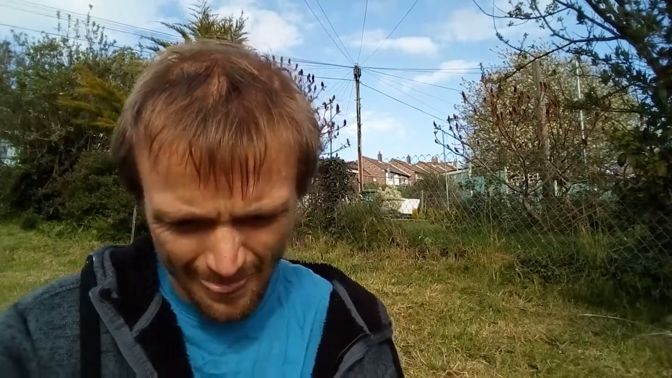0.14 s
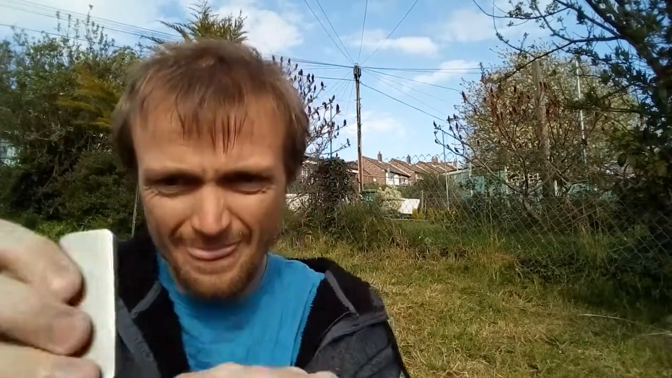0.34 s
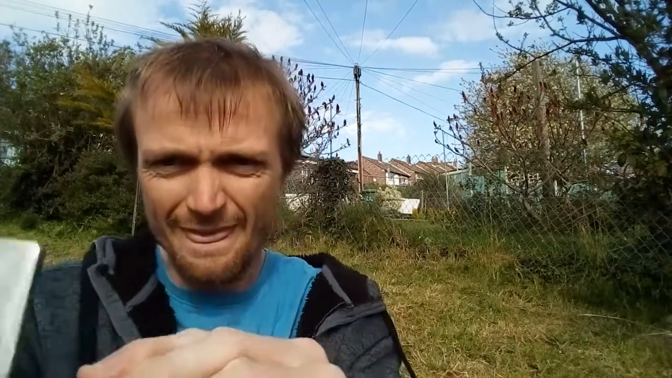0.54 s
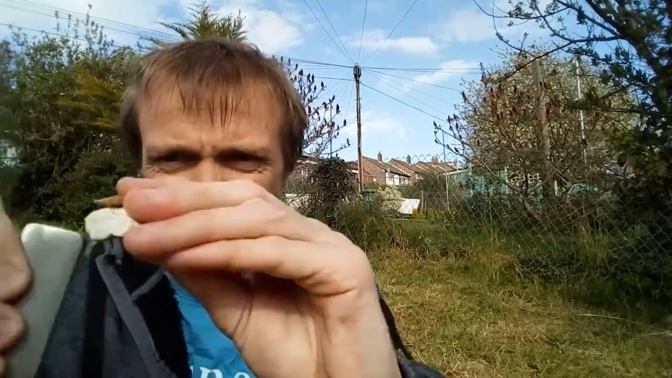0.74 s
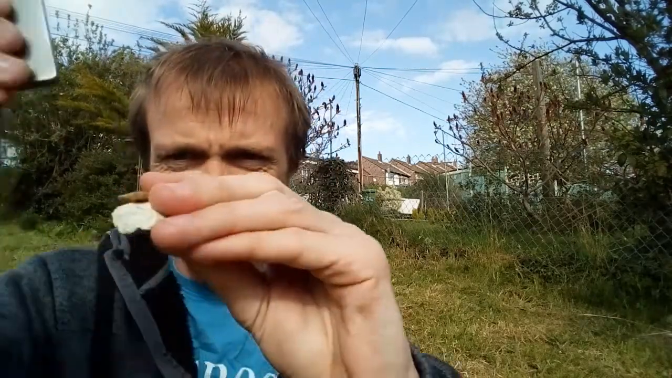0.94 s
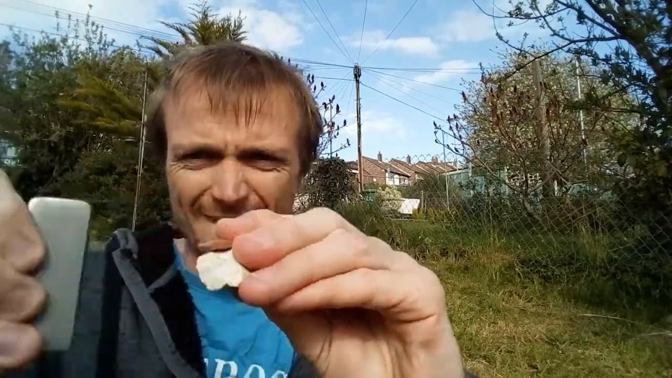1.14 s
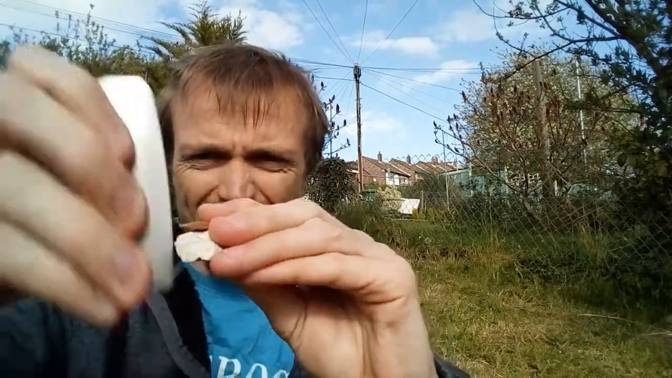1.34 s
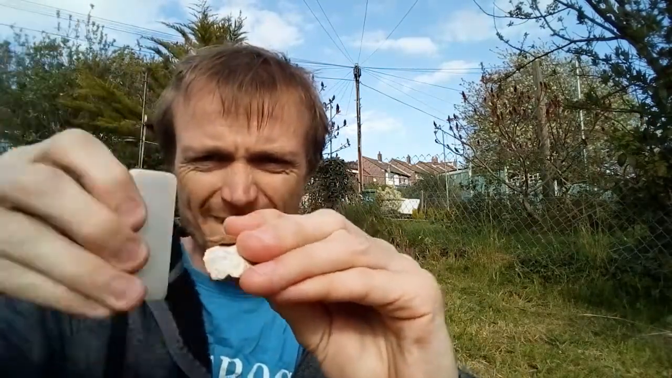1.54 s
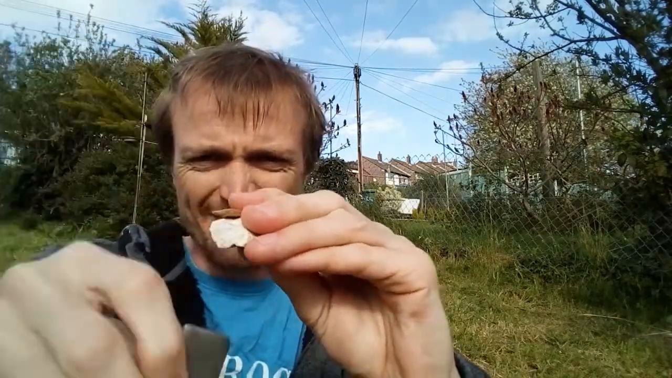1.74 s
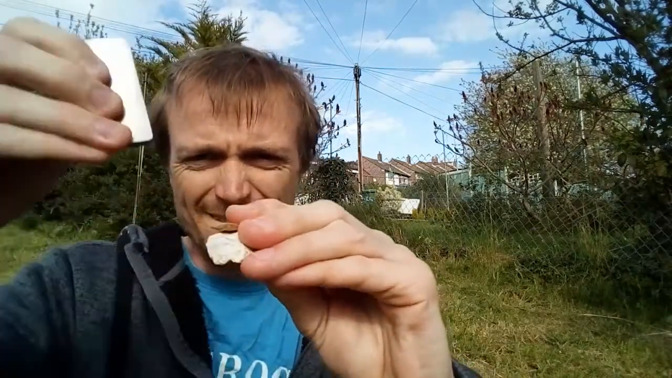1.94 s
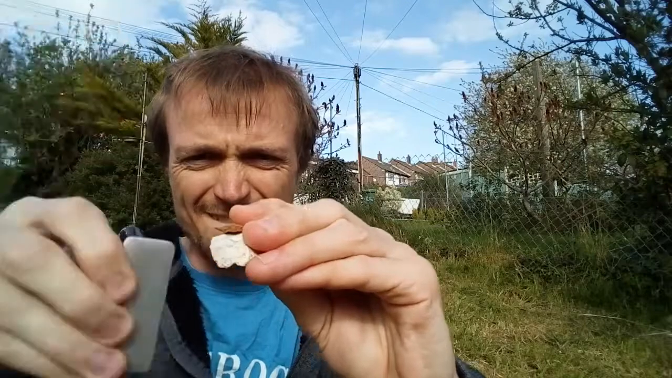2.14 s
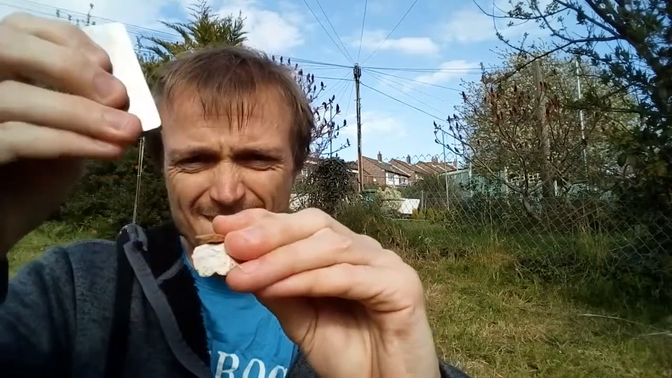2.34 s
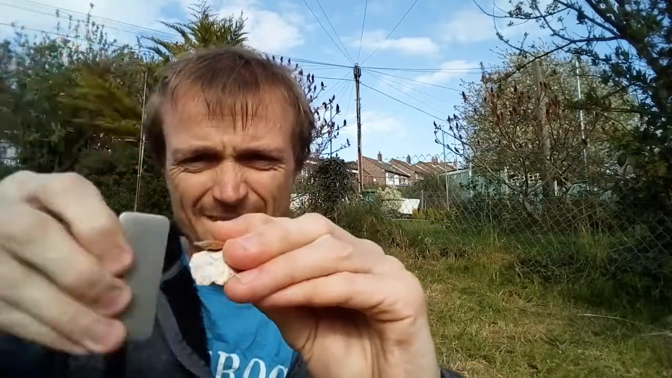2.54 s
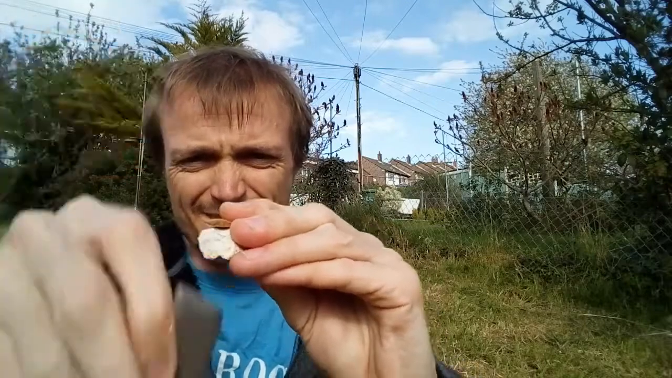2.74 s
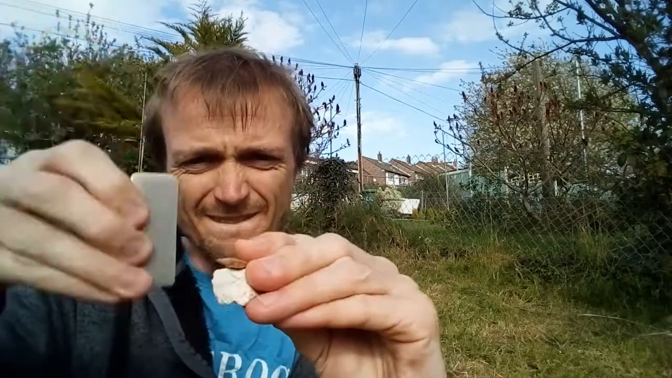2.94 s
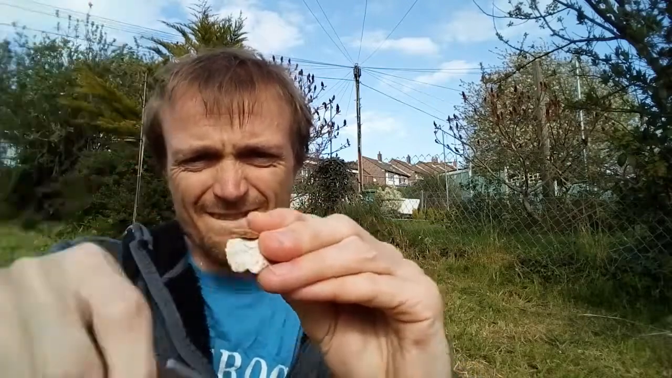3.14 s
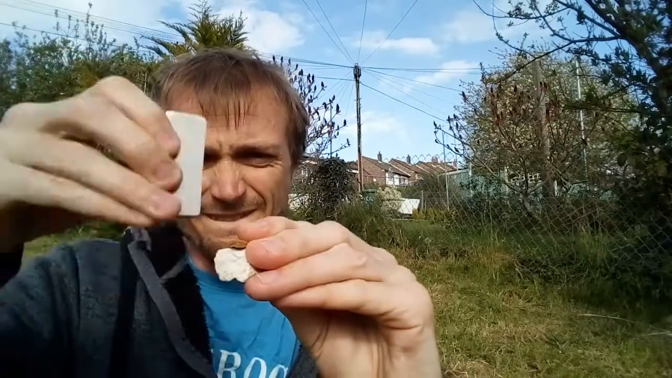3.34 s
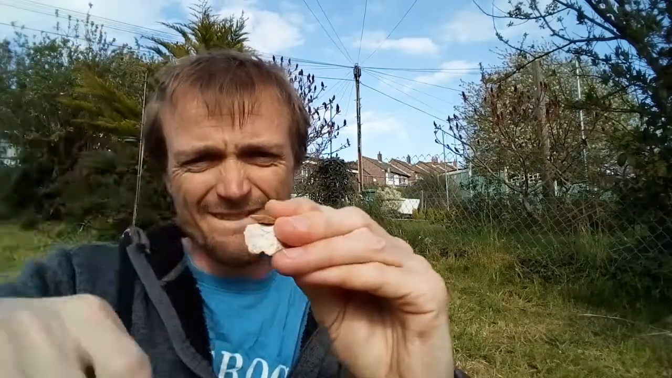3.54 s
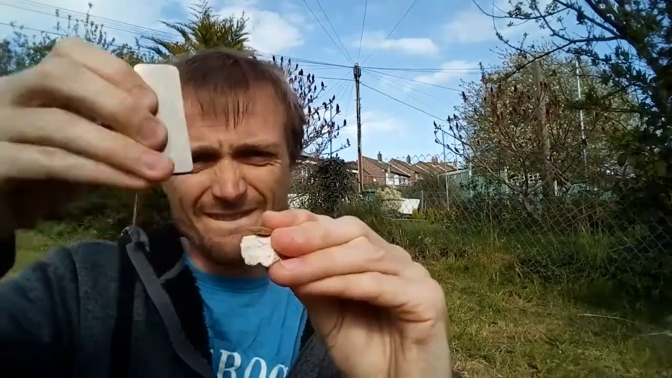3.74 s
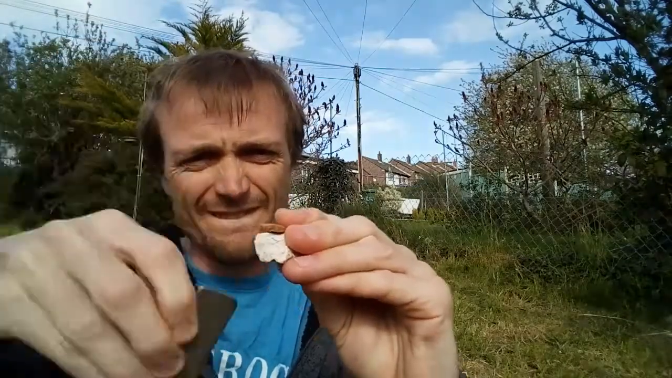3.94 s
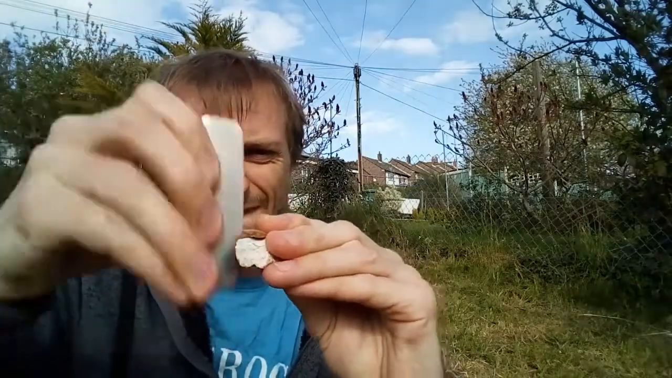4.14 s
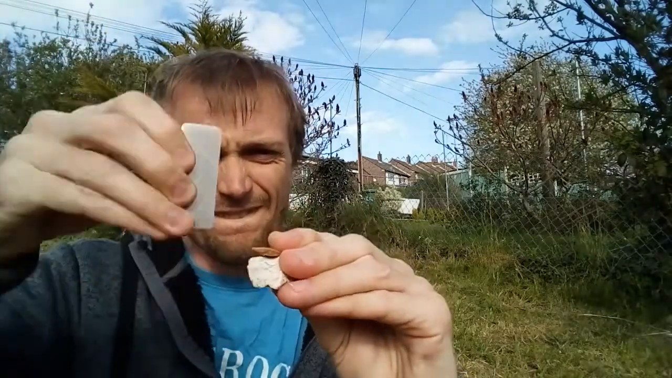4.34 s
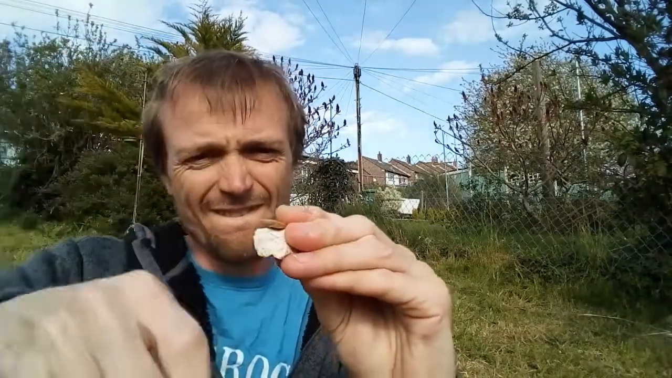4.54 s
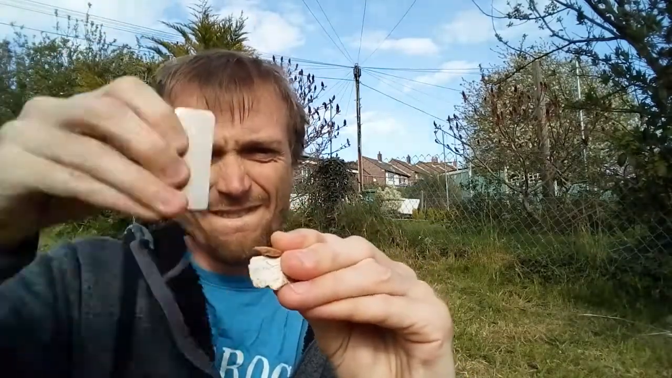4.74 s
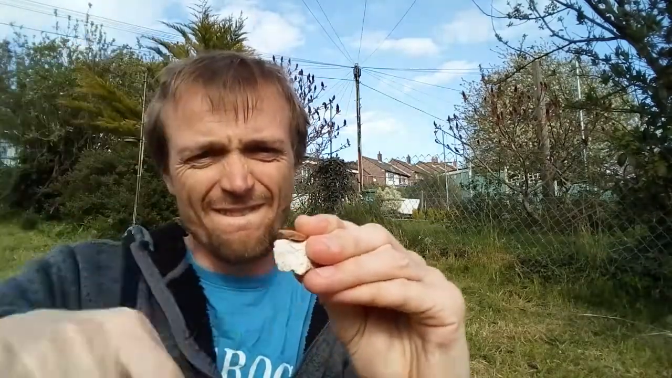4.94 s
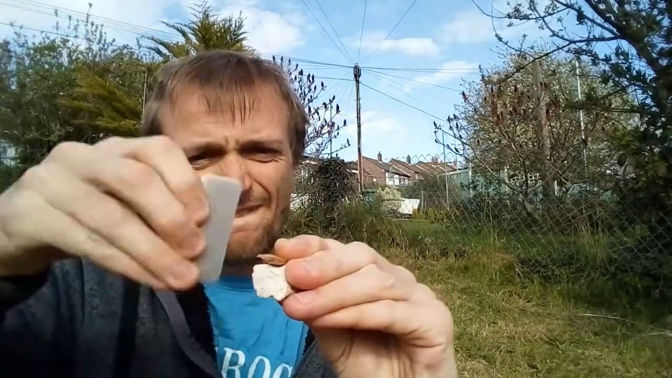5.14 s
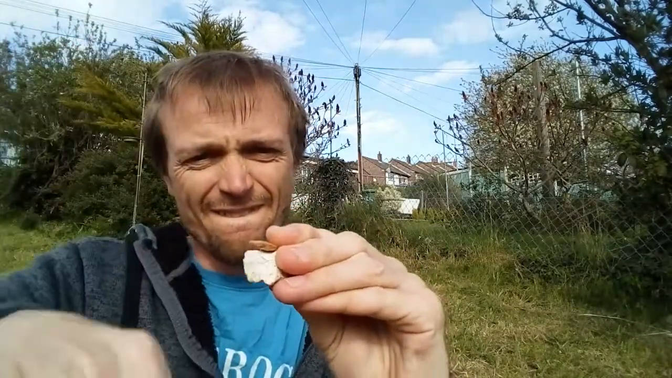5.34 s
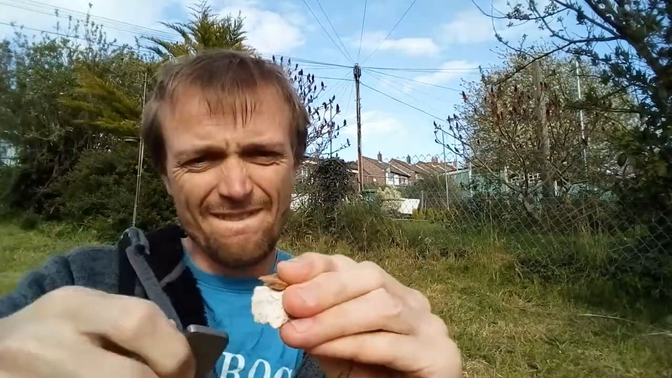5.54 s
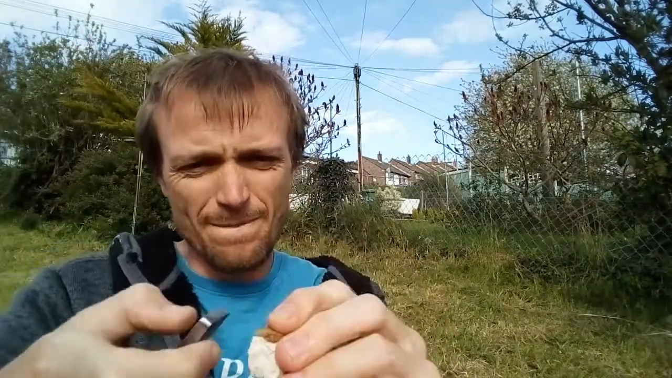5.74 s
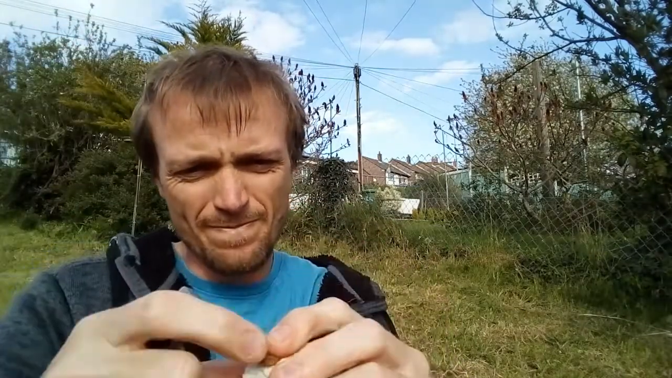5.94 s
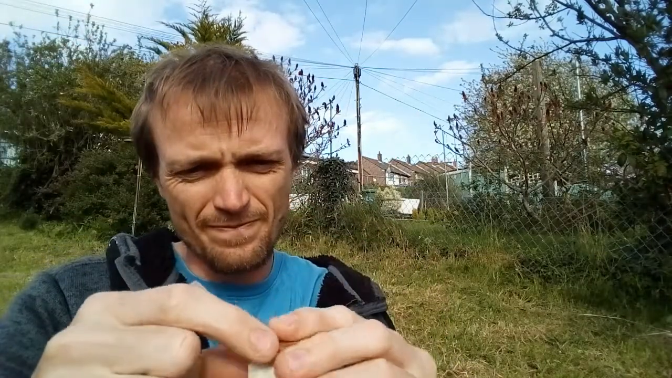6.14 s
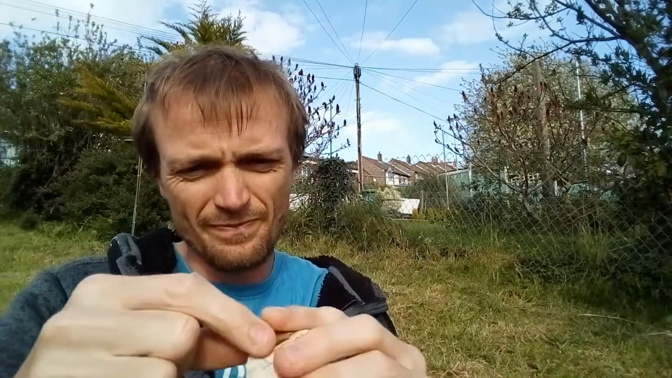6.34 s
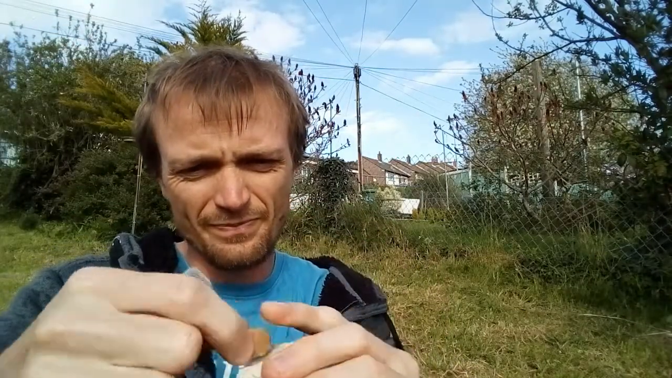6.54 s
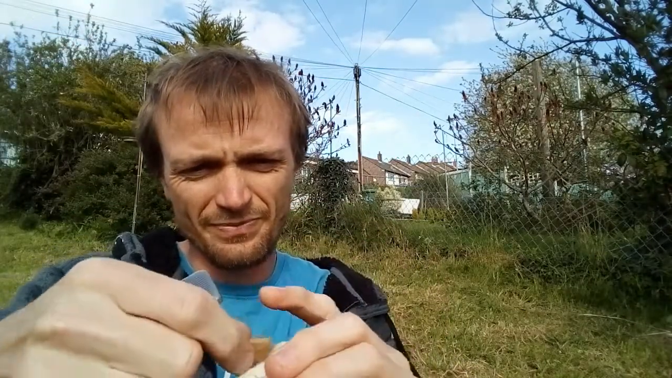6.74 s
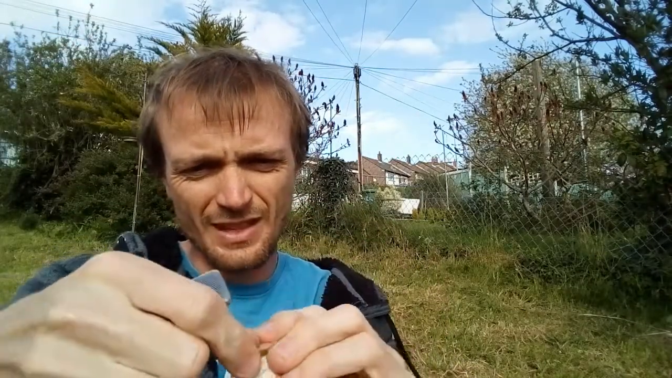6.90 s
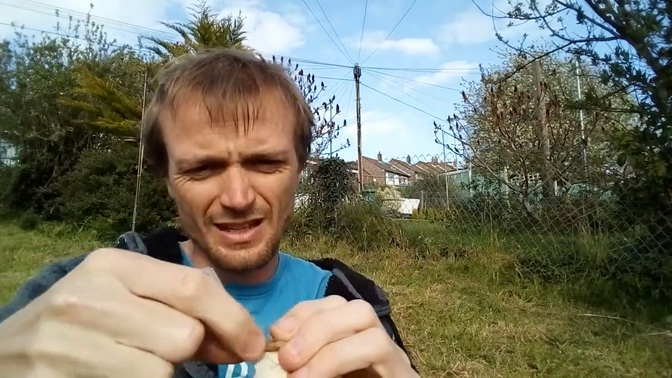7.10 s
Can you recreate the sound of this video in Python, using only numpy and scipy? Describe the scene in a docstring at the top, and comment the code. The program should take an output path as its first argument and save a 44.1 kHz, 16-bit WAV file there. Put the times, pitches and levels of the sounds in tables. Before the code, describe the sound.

Very close to a stereo microphone outdoors, a small steel striker snaps down a flint fifteen times, roughly three strokes a second. Each is a hard, dry crack with a tiny gritty scrape and a faint metallic ping. Wind rumbles low, gusting near two and just after three seconds. Weak garden echoes and very distant chirps sit behind. Strokes stop after five seconds, leaving quiet air.

```python
"""In a garden, a steel striker is swept down a flint fifteen times, close to a two-port microphone.
In each stroke the steel lands, bites, scrapes and flicks off: bursts and grains of noise ring the stone.
Decaying tones make the steel ping faintly, and scattered echoes make the garden answer.
Shaped noise makes wind rumble on the microphone; gliding tones make small birds chirp far away.
Soft hiss, a low drone and a thin whine lie beneath."""
import sys
import numpy as np
from scipy import signal
from scipy.fft import rfft, irfft
from scipy.io import wavfile
from scipy.ndimage import uniform_filter1d

SR = 44100
rng = np.random.default_rng(int(sys.argv[2]) if len(sys.argv) > 2 else 0)


def waveform_to_disk(signal):
    """Save audio, clipped to [-1, 1], as 16-bit WAV at the path in sys.argv[1]."""
    frames = np.transpose(np.atleast_2d(signal))
    scaled = np.clip(frames, -1, 1) * 32767
    samples = np.round(scaled).astype(np.int16)
    wavfile.write(sys.argv[1], SR, samples)


N = 316064

# The strokes; stroke() trims the scrape and the blows by a small shared amount.
# Each row: start in seconds, length in seconds, scrape level in dB, fade of the scrape in dB,
# landing blow in dB, delay of the bite in seconds, bite in dB, parting blow in dB,
# lower note of the stone in Hz, upper note in Hz, knock in dB, clack in dB, sizzle in dB.
STRIKER_STROKES = [(.4167, .025, -31, 20, -3.5, 0.0036, -31, -29, 3440, 4500, -7, 4, 11.5),
                   (.734, .029, -26, 16.5, -9, .0056, -2, -18, 2200, 3800, 4.5, 0, 1),
                   (1.0368, .028, -25, 10.5, -14.5, .0033, 1, -18, 2953, 4450, -7, 0.5, -4),
                   (1.392, .021, -26.5, 9.5, -10.5, .0041, 3, -11, 2290, 5850, 7.5, -1, 2),
                   (1.7308, .015, -24, 8, -1.5, .0017, 2, -14, 2920, 5990, -0.5, 3.5, -3),
                   (2.0596, .024, -22.5, 11, -4, .0082, 3, -6.5, 3350, 3910, 0, -4.5, -2),
                   (2.4084, .016, -17.5, 10.5, -1, .0072, -1.5, -13.5, 2290, 3800, -4.5, 0, -6.5),
                   (2.7606, .014, -22, 4.5, -11, .008, 2, -14, 2533, 2860, -5.5, -2, -4.5),
                   (3.121, .0213, -23, 8, -0.5, .003, 0, -16, 3420, 6070, 4, -5.5, 0),
                   (3.498, .004, -23.5, 3.5, 1.1, .0005, -5.5, -11.5, 1994, 4200, 8.5, -0.5, 6),
                   (3.854, .0247, -27.5, 3.5, -10.5, .0078, -3, -15.5, 2352, 7300, 4, 2.5, 1.5),
                   (4.1857, .016, -35.5, -9, -1.5, .005, -5, -7, 2025, 4320, -0.5, -1, -3),
                   (4.5173, 0.015, -26.5, -0.5, -7, .0066, 0, -13, 2427, 3300, -4.5, -2, 1.5),
                   (4.8934, .015, -27, 2, -3, .0051, 2.5, -22, 2450, 5550, -2, -0.5, 1.5),
                   (5.3296, .0055, -19.5, 4.5, -5, 0.00101, -0.5, -4.5, 2570, 4380, 8, 1.5, 2)]
# Light ticks and brushes. Each row: start in seconds, time to die to about a third in seconds,
# starting level in dB, centre in Hz, width in octaves, ring of the steel in dB against its usual ring.
LIGHT_TOUCHES = [(.0025, 0.004, -27, 4090, 1.5, 16), (0.477, .012, -48.5, 2070, .69, -12),
                 (0.489, 0.011, -46.5, 2000, 0.43, 7), (2.991, 0.0031, -61, 4560, 0.54, -14),
                 (5.226, .0018, -60, 4500, 0.72, -11), (7.136, .0044, -42.5, 1890, 0.16, -5)]
# Thin, very short treble ticks just before two of the strokes. Each row: start in seconds, level in dB.
TREBLE_TICKS = [(.7135, -32), (.7237, -16.5), (4.874, -22), (4.8836, -13.5)]
# The colour of these ticks. Each row: pitch in Hz, relative level in dB per Hz.
TICK_SPECTRUM = [(1500, -25), (4000, -9), (5600, -2), (8000, -14), (11000, -7.5), (13000, -9.5),
                 (14600, -1), (16000, -6)]
# The crack of the stone, before each contact colours it. Each row: pitch in Hz, relative level in dB per Hz.
STONE_CRACK = [(250, -54), (590, -41.5), (750, -21.5), (1050, -17), (1330, -9), (1650, -7.5), (2350, -1),
               (3200, -4.5), (3950, -1.5), (5000, -7), (5750, -4.5), (6700, -11.5), (9800, -14),
               (12500, -21.5), (15500, -32.5)]
# The steel, damped by the fingers. Each row: pitch in Hz, level in dB against the contact,
# time to fall by 60 dB in seconds.
STEEL_MODES = [(7410, -11, .011), (12000, -16.5, .013), (7245, -34, .14), (7430, -36, .1),
               (11770, -34.5, .1), (14350, -32, .02)]
# How the ports differ for sound from the hands. Each row: pitch in Hz, left minus right in dB.
PORT_BALANCE = [(700, 0.5), (1600, 3), (2400, -2.5), (3200, -12), (3900, 7.5), (4500, 10), (5100, -13),
                (6000, -3.5), (6700, 3), (7250, -1.5), (8200, -11.5), (12500, -16), (15000, -7)]
# Their timing. Each row: pitch in Hz, lead of the left port in radians.
PORT_LEAD = [(700, 1), (3250, 0.62), (3550, 2), (4150, 2.5), (4450, 4), (4950, 4.5), (5250, 2.5),
             (5550, -0.35), (6400, 2), (6900, -2.24), (10000, 4.5), (11500, 1.5)]
# Scatter from hedges and fences. Each row: pitch in Hz, relative level in dB.
GARDEN_SPECTRUM = [(700, -21.5), (2000, -32), (4000, -27.5), (7300, -22.5), (9000, -27.5), (15000, -32)]
# How long it lingers. Each row: pitch in Hz, time to fall by 60 dB in seconds.
GARDEN_DECAY = [(700, .25), (2500, 0.34), (5000, 0.31), (8000, 0.15), (15000, .15)]
# Far birds. Each row: start in seconds, length in seconds, start in Hz, end in Hz,
# level in dB before the shared gains.
BIRD_CHIRPS = [(0.175, 0.046, 6100, 5620, -76.5), (0.215, 0.046, 11300, 9500, -78),
               (1.194, 0.032, 3210, 4770, -76), (1.305, .027, 4730, 5200, -76.5),
               (1.502, 0.071, 4740, 4770, -74.5), (2.249, .082, 7240, 6450, -79),
               (2.63, .076, 5700, 5440, -77), (2.924, 0.055, 3190, 4330, -75),
               (3.253, 0.025, 6400, 6400, -71), (4.269, 0.05, 4520, 5040, -71),
               (5.1, 0.058, 5850, 5530, -74), (5.559, .049, 4840, 4720, -77.5),
               (5.653, 0.045, 4750, 4710, -79.5), (5.728, 0.053, 4790, 4750, -81),
               (5.918, .025, 6140, 6400, -78.5), (6.109, .025, 6110, 6350, -79.5),
               (6.115, .041, 2700, 3630, -81), (6.147, 0.036, 3540, 3760, -74),
               (6.176, 0.037, 3745, 3550, -70.5), (6.225, 0.031, 3700, 3600, -78.5),
               (6.682, .04, 4200, 4660, -81)]
# A faint low hollow sound now and then. Each row: start in seconds, length in seconds, level in dB at the height.
HOLLOW_SWELLS = [(0.279, 0.42, -68), (4.403, 0.37, -69.5), (5.819, .45, -70)]
# The steady breeze on the microphone. Each row: time in seconds, rumble in dB,
# deep pressure swell in dB before its shared gain.
BREEZE_LEVELS = [(0, -57.5, -60.5), (.8, -58, -56), (1.35, -62, -57), (2.6, -56, -55.5),
                 (2.9, -59.5, -66.5), (3.65, -53.5, -59), (4.1, -60, -64), (4.65, -55.5, -60.5),
                 (5.15, -62.5, -73.5), (6.1, -59, -57.5), (6.4, -64, -62), (6.8, -60, -54.5),
                 (7.17, -61, -66.5)]
# Gusts on top of the breeze. Each row: peak in seconds, time from the peak to about a third in seconds,
# rumble in dB at the peak.
GUST_PEAKS = [(1.16, 0.041, -44), (1.255, 0.026, -45.5), (1.717, .035, -38.5), (1.959, 0.046, -34.5),
              (3.14, .1, -41.5), (3.32, 0.06, -35), (3.438, 0.0478, -34)]
# Rumble of calm wind. Each row: pitch in Hz, relative level in dB per Hz.
CALM_RUMBLE = [(50, -25), (80, 0.5), (120, -1), (160, -7), (240, -20), (400, -28.5), (700, -41.5),
               (1500, -75.5)]
# Buffeting of strong gusts. Each row: pitch in Hz, relative level in dB per Hz.
GUST_BUFFET = [(50, -26), (80, -6), (105, -1), (122, 3), (160, -12), (240, -20.5), (350, -32), (700, -42.5),
               (1500, -70.5)]
# The deep swell beneath the wind. Each row: pitch in Hz, relative level in dB per Hz.
DEEP_SWELL = [(20, -13), (38, -10.5), (58, 2), (72, 2.5), (100, -20), (200, -65.5)]
# The quiet of the garden. Each row: pitch in Hz, relative level in dB per Hz.
AIR_SPECTRUM = [(60, -10), (300, 2.5), (550, -3), (850, -1.5), (1500, -8.5), (2500, -11.5), (4500, -12),
                (6500, -14.5), (8200, -21.5), (13500, -20.5), (15000, -15), (15500, -15.5), (15900, -44.5)]
# Its loudness. Each row: time in seconds, level in dB before drift and left-right balance.
AIR_LEVEL = [(0, -67), (.8, -67.5), (1.2, -68), (3, -69.5), (5.5, -69.5), (5.8, -67.5), (6.5, -70),
             (7.17, -65.5)]
# How alike noise is on the left and right. Each row: pitch in Hz, likeness from 0 (separate) to 1 (the same).
PORT_LIKENESS = [(60, .85), (130, 0.81), (290, 0.74), (640, .2), (1410, 0), (15000, 0)]
# A thin whine that sinks slowly. Each row: time in seconds, base pitch in Hz before drift.
WHINE_PITCH = [(0, 3165), (.8, 3130), (1.6, 3075), (2.6, 3030), (4.5, 3015), (6, 2990), (7.17, 2985)]
# Its tones. Each row: multiple of the base pitch, level in dB before drift.
WHINE_TONES = [(2, -89), (3, -93), (4, -96.5)]

HUM_HZ, HUM_DB = 118, -63.5  # middle of the wavering drone
GUST_DEEP_DB = -8.5  # the deep swell under a gust, against its rumble
# a square hit knocks below the first pitch, a flat one clacks around the second, a keen edge sizzles above the third
KNOCK_HZ, CLACK_HZ, SIZZLE_HZ = 1200, 1480, 6660
CLACK_WIDTH_HZ = 420
FENCE_S, FENCE_DB, FENCE_FROM_HZ = 0.032, -33, 3500  # one distinct, thin echo, perhaps from a fence
EDGE_HZ = 16200  # top of the band


def stroke(s, length, scrape_db, fade_db, land_db, bite_s, bite_db, part_db,
           low_hz, high_hz, knock_db, clack_db, sizzle_db,
           release_s=.0026, crumble_s=.0009, crumble_db=-3.5, blow_db=-1.1, grit_db=-.5,
           note_db=4, note_width_hz=130, stutter_db=3.0, catches_per_s=500, catch_db=16,
           scrape_bright_db=-.3, land_bright_db=0.67, bite_bright_db=0.77, part_bright_db=1.5):
    """The steel lands, bites a moment later, scrapes down the edge and flicks off; each contact excites the stone."""
    t = np.arange(round(length * SR) + SR // 40) / SR
    progress = np.minimum(t / length, 1)

    def stone(bright_db):
        """The response of the stone to one sharp or blunt contact."""
        def spectrum(hz):
            """The crack, coloured by how the steel meets the stone."""
            notes = sum(note_db / (1 + ((hz - f) / note_width_hz) ** 2) for f in (low_hz, high_hz))
            knock = knock_db / (1 + (hz / KNOCK_HZ) ** 6)
            clack = clack_db * np.exp(-((hz - CLACK_HZ) / CLACK_WIDTH_HZ) ** 2)
            # less below the sizzle pitch leaves relatively more above it
            dulling = sizzle_db / (1 + (hz / SIZZLE_HZ) ** 4)
            return read(STONE_CRACK, hz) + knock - dulling + clack + notes + tilt(hz, bright_db)
        return ring(spectrum)

    # the edge grips and lets go every millisecond or two, and now and then catches harder
    stutter = evened(uniform_filter1d(rng.standard_normal(len(t)), size=60))
    fractures = grit(len(t)) * amp(stutter_db * stutter)
    fractures += amp(catch_db) * grit(len(t), spread_db=2.0, grains_per_s=catches_per_s)

    pressure = amp(scrape_db + grit_db - fade_db * progress)
    pressure *= np.exp(-np.maximum(t - length, 0) / release_s)
    sound = pressure * signal.fftconvolve(fractures, stone(scrape_bright_db))[:len(t)]
    sound *= np.linalg.norm(pressure) / np.linalg.norm(sound)

    blows = ((0, land_db, land_bright_db), (bite_s, bite_db, bite_bright_db),
             (length, part_db, part_bright_db))
    for at, db, bright_db in blows:
        # a blow is one sharp push, then a moment of crumbling
        chips = grit(len(t)) * np.exp(-t / crumble_s)
        push = amp(crumble_db) * chips / (np.linalg.norm(chips) + 1e-9)
        push[0] += 1
        crack = signal.fftconvolve(push, stone(bright_db))
        add(sound, at, amp(db + blow_db) * crack / np.linalg.norm(crack))
    return s, near_echoes(with_steel(sound))


def grit(n, spread_db=4, grains_per_s=9000):
    """Grains of uneven size, as when an edge shaves steel in tiny fractures: clicks at random moments."""
    size = amp(spread_db * np.minimum(rng.exponential(1, n), 3))
    happens = rng.random(n) < grains_per_s / SR
    return rng.choice([-1, 1], n) * size * happens


def with_steel(x, ring_db=0):
    """The striker pings: each of its modes is a decaying tone added to the contact sound."""
    t = np.arange(SR // 5) / SR
    h = np.zeros(len(t))
    for hz, db, t60 in STEEL_MODES:
        mode = amp(-60 * t / t60) * np.sin(2 * np.pi * hz * t)
        h += amp(ring_db + db) * mode / np.linalg.norm(mode)
    h[0] += 1  # the contact itself
    return signal.fftconvolve(x, h)


def touch(s, length, db, centre_hz, octaves, ring_db):
    """A light tick or brush: a dying burst of grit in one band."""
    t = np.arange(round(4 * length * SR) + SR // 100) / SR
    band = ring(lambda hz: -10 * np.log10(1 + (np.log2((hz + 1) / centre_hz) / octaves) ** 4))
    burst = evened(signal.fftconvolve(grit(len(t)), band)[:len(t)])
    return s, with_steel(amp(db) * np.exp(-t / length) * burst, ring_db)


def treble_tick(s, db, fade_s=.0012):
    """A thin, very short tick: a dying spit of bright grains."""
    t = np.arange(SR // 100) / SR
    spit = grit(len(t)) * np.exp(-t / fade_s)
    sound = signal.fftconvolve(spit, ring(lambda hz: read(TICK_SPECTRUM, hz)))
    return s, amp(db) * sound / np.linalg.norm(sound)


def near_echoes(x, hands_db=-13, chest_db=-25, count=6):
    """The moving hands and the chest throw back a few echoes, new for each stroke and each port."""
    h = np.zeros((2, SR // 50))
    h[:, 0] = 1
    # hands within 2 ms, chest from 2.5 to 18 ms; delays counted in samples
    for db, first, last in ((hands_db, 8, SR // 500), (chest_db, SR // 400, SR // 55)):
        for port in h:
            port[rng.integers(first, last, count)] += amp(db) * rng.choice([-1, 1], count) / np.sqrt(count)
    return signal.fftconvolve(x[None], h, axes=1)


def ports(x):
    """The body of the microphone shades and delays each port differently; left and right gains keep total power."""
    hz = np.fft.rfftfreq(N, 1 / SR)
    ratio = amp(read(PORT_BALANCE, hz))
    left, right = rfft(x) * np.sqrt(2 / (1 + ratio ** 2))
    lead = np.exp(1j * read(PORT_LEAD, hz))
    return irfft([left * ratio * lead, right], N)


def garden(x, start_s=.009):
    """Faint sparse echoes from the ground, hedges and fences, each pitch dying at its own pace."""
    taps = rng.standard_normal((2, SR // 2)) * (rng.random((2, SR // 2)) < 2500 / SR)
    hz, t, z = signal.stft(taps / taps.std(), SR, nperseg=256)
    t60 = read(GARDEN_DECAY, hz)[:, None]
    z *= amp(read(GARDEN_SPECTRUM, hz)[:, None] - 60 * t / t60)
    z *= np.sqrt(2 * np.log(1000) / (t60 * SR))  # same energy for long and short tails
    tail = signal.istft(z, SR, nperseg=256)[1]
    tail = np.pad(tail, ((0, 0), (round(start_s * SR), 0)))
    return signal.fftconvolve(x[None], tail, axes=1)[:, :N] * amp([[-2], [1.5]])


def fence(x):
    """One late, quiet copy of the sound, thinned by removing its low notes."""
    thin = signal.lfilter(*signal.butter(2, FENCE_FROM_HZ, "high", fs=SR), x)
    return FENCE_S, amp(FENCE_DB) * thin


def chirp(s, length, from_hz, to_hz, db, waver=.012):
    """A bird: one gliding, slightly unsteady whistle."""
    n = round(length * SR)
    wobble = evened(uniform_filter1d(rng.standard_normal(n), size=100))
    hz = np.linspace(from_hz, to_hz, n) * (1 + waver * wobble)
    return s, amp(db) * 2 * np.hanning(n) * np.sin(2 * np.pi * np.cumsum(hz) / SR)


def hollow_swell(s, length, db, centre_hz=355, width_hz=90):
    """A narrow band of noise that rises and falls away."""
    n = round(length * SR)
    band = ring(lambda hz: -20 * np.log10(1 + ((hz - centre_hz) / width_hz) ** 4))
    noise = evened(signal.fftconvolve(rng.standard_normal(n), band)[:n])
    return s, amp(db) * np.hanning(n) * noise


def wind(wind_db=0.0, swell_db=0.5, gust_from_db=-51, gust_range_db=10, gust_pan_db=1,
         flutter_db=2.5, deep_flutter_db=1.0, flutter_hz=7):
    """Rumble that follows the breeze; strong gusts buffet the ports with a hollower note."""
    t = np.arange(N) / SR
    s, rumble_db, deep_db = np.transpose(BREEZE_LEVELS)
    gust_power = sum((amp(db) * np.exp(-((t - at) / width) ** 2)) ** 2 for at, width, db in GUST_PEAKS)
    gusts = np.sqrt(gust_power)
    breeze = amp(np.interp(t, s, rumble_db) + flutter_db * drift(flutter_hz))
    deep_breeze = amp(np.interp(t, s, deep_db) + deep_flutter_db * drift(flutter_hz))
    level = np.hypot(breeze, gusts)
    deep = np.hypot(deep_breeze, amp(GUST_DEEP_DB) * gusts)
    # 0 in calm air, 1 in a strong gust
    gusty = np.clip((20 * np.log10(level) - gust_from_db) / gust_range_db, 0, 1)

    def blow(calm, rough):
        """Calm air reaches both ports more alike; the eddies of a gust also hit each on its own."""
        separate = np.array([noise_pair(rough)[0], noise_pair(rough)[1]])
        eddies = evened(noise_pair(rough) + separate) * amp([[gust_pan_db], [-gust_pan_db]])
        x = np.sqrt(1 - gusty) * noise_pair(calm) + np.sqrt(gusty) * eddies
        # keep the loudness even, so that the level curves alone shape it
        return x / np.sqrt(uniform_filter1d((x ** 2).mean(0), size=3000))

    rumble = amp(wind_db) * level * blow(CALM_RUMBLE, GUST_BUFFET)
    return rumble + amp(swell_db) * deep * blow(DEEP_SWELL, DEEP_SWELL)


def noise_pair(spectrum):
    """Noise of a given spectrum, alike in both ports mainly in the bass."""
    hz = np.fft.rfftfreq(N, 1 / SR)
    a, b = rfft(rng.standard_normal((2, N)))
    same = np.clip(read(PORT_LIKENESS, hz), -1, 1)
    right = same * a + np.sqrt(1 - same ** 2) * b
    return evened(irfft(np.array([a, right]) * amp(read(spectrum, hz)), N))


def air():
    """Soft outdoor hiss: shaped noise whose level drifts a little."""
    return amp(follow(AIR_LEVEL) + .5 * drift(6)) * noise_pair(AIR_SPECTRUM) * amp([[-1], [1]])


def drone():
    """One low tone that wavers in pitch and level."""
    turns = np.cumsum(HUM_HZ + 4 * drift(4.2)) / SR
    return amp(HUM_DB + 2.2 * drift(4)) * np.sin(2 * np.pi * turns)


def whine():
    """Tones at multiples of one slowly sinking, unsteady pitch."""
    turns = np.cumsum(follow(WHINE_PITCH) + 6 * drift(40)) / SR
    return sum(amp(db + 3 * drift(8)) * np.sin(2 * np.pi * k * turns) for k, db in WHINE_TONES)


def amp(db):
    """Decibels to gain."""
    return 10 ** (np.asarray(db) / 20)


def evened(x):
    """Scales a sound to an average strength (rms) of 1."""
    return x / np.sqrt(np.mean(x ** 2) + 1e-20)


def read(points, hz):
    """Reads a spectrum on a log-frequency axis."""
    f, value = np.transpose(points)
    return np.interp(np.log(hz + 1), np.log(f), value)


def follow(points):
    """Reads a time curve at every sample."""
    return np.interp(np.arange(N) / SR, *np.transpose(points))


def add(mix, s, sound):
    """Mixes a sound in at time s, cutting what runs past the end."""
    part = mix[..., max(round(s * SR), 0):][..., :sound.shape[-1]]
    part += sound[..., :part.shape[-1]]


def drift(rate_hz):
    """Slow random wandering of rms 1, mostly below the given rate."""
    hz = np.fft.rfftfreq(N, 1 / SR)
    return evened(irfft(rfft(rng.standard_normal(N)) * np.exp(-(hz / rate_hz) ** 2), N))


def tilt(hz, db):
    """Brightness: db more in the treble, db less in the low notes."""
    return db * np.tanh(np.log((hz + 1) / 4000) * 1.8)


def ring(gain_db, size=2048):
    """A response of energy 1 with the spectrum gain_db(hz), starting at once (minimum phase)."""
    db = gain_db(abs(np.fft.fftfreq(size, 1 / SR)))
    log_gain = np.log(amp(db - db.max()) + 1e-5)
    h = np.fft.ifft(np.exp(np.conj(signal.hilbert(log_gain)))).real[:size // 2]
    return h / np.linalg.norm(h)


def scene():
    """Near strokes with their echoes, far birds, wind and background."""
    hands, birds, swells = np.zeros((3, 2, N)), np.zeros(N), np.zeros(N)
    for k, row in enumerate(STRIKER_STROKES):
        add(hands[k % len(hands)], *stroke(*row))  # three places in turn, each with its own garden echoes
    for row in LIGHT_TOUCHES:
        add(hands[0], *touch(*row))
    for row in TREBLE_TICKS:
        add(hands[0], *treble_tick(*row))
    for row in BIRD_CHIRPS:
        add(birds, *chirp(*row))
    for row in HOLLOW_SWELLS:
        add(swells, *hollow_swell(*row))
    near = hands.sum(0)
    echoes = sum(garden(place.mean(0)) for place in hands)
    add(echoes, *fence(near))
    far = amp(0.5) * birds + amp(23) * garden(birds) + swells
    return ports(near) + echoes + far + wind() + air() + drone() + whine()


def record(dry):
    """The microphone's band limit: a steep filter removes the highest treble."""
    low_pass = signal.firwin(255, EDGE_HZ, window=("kaiser", 9), fs=SR)
    return signal.oaconvolve(dry, low_pass[None], "same")


dry = scene()
out = record(dry)
waveform_to_disk(out)
```